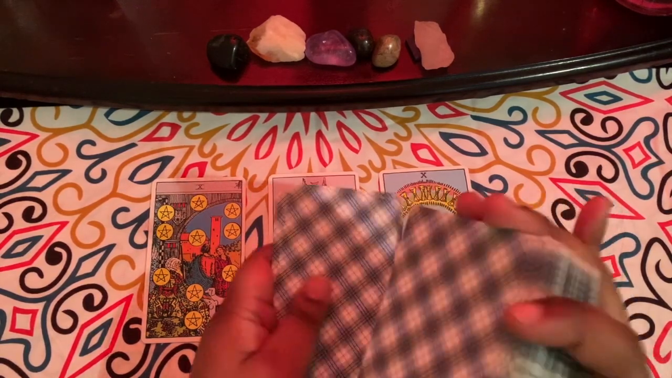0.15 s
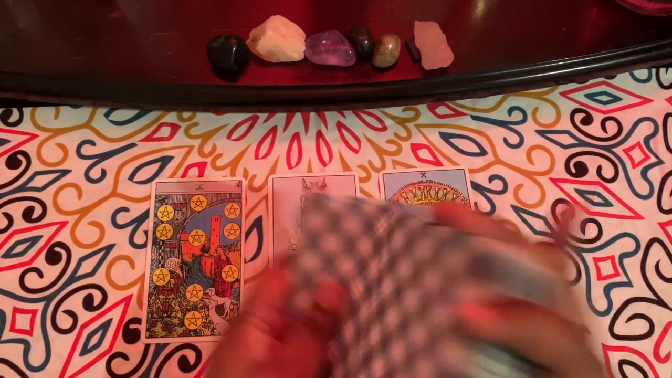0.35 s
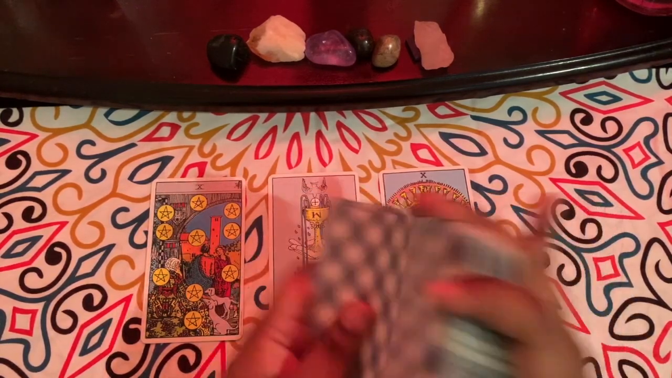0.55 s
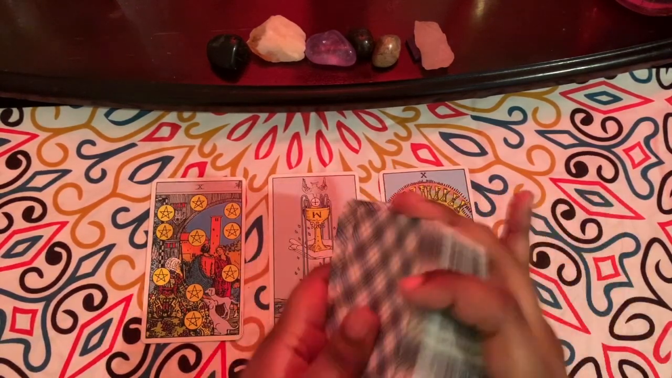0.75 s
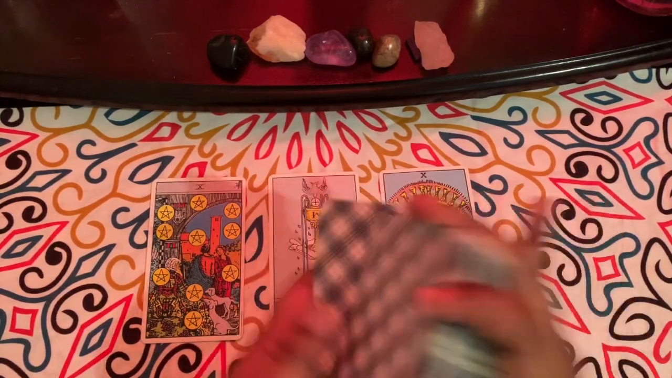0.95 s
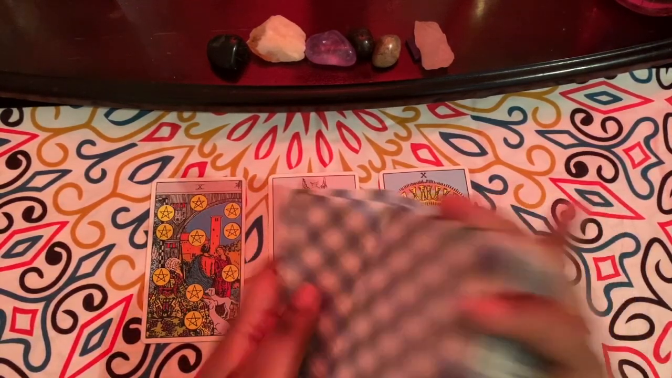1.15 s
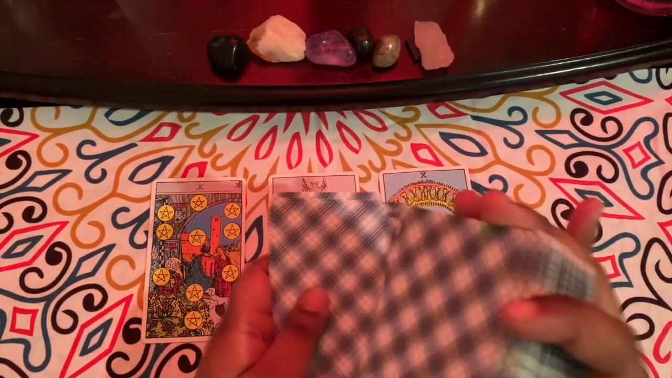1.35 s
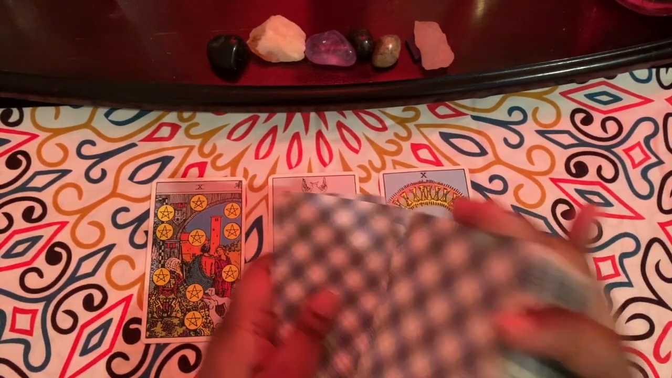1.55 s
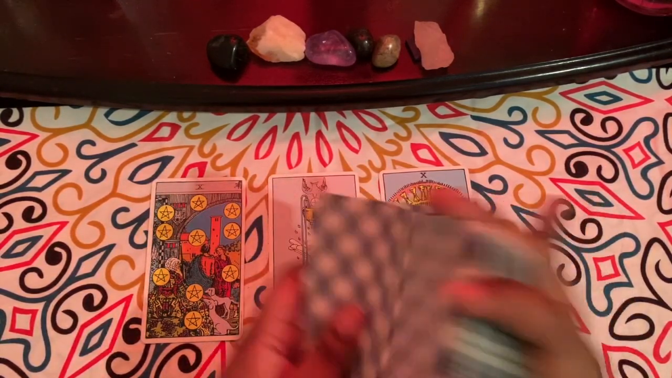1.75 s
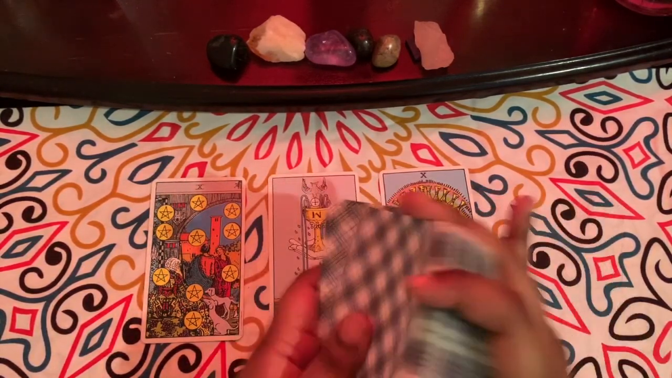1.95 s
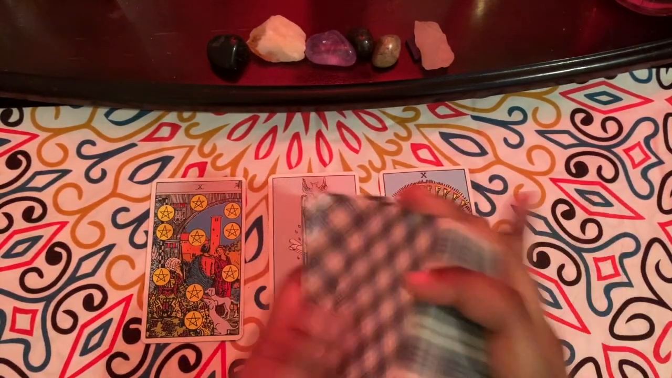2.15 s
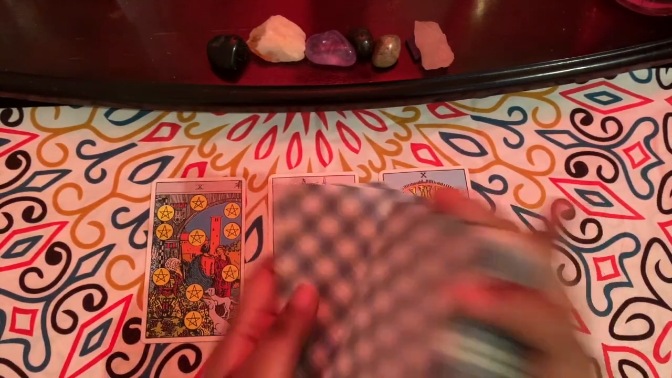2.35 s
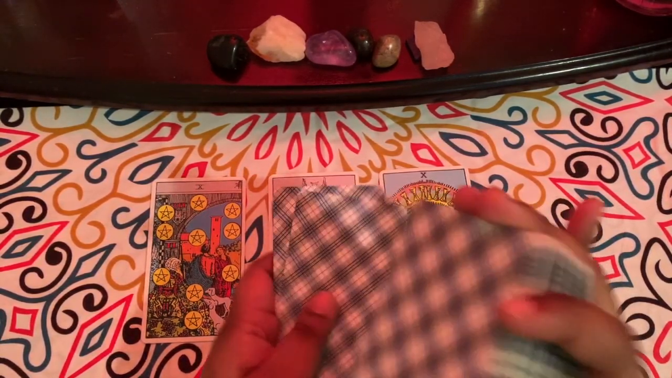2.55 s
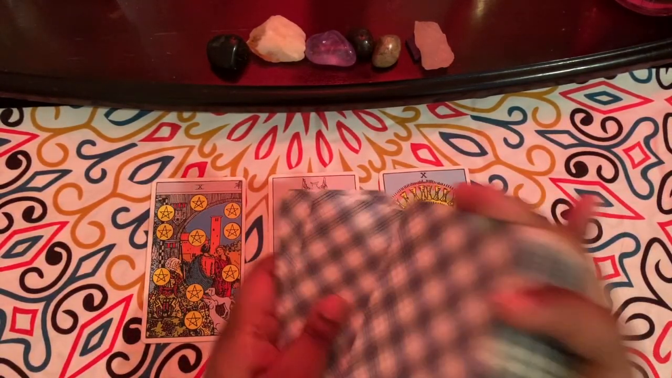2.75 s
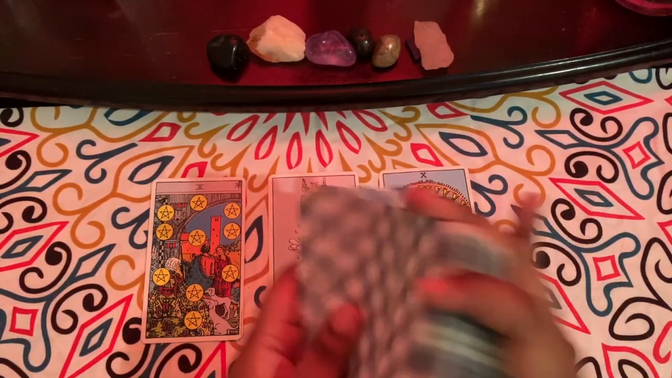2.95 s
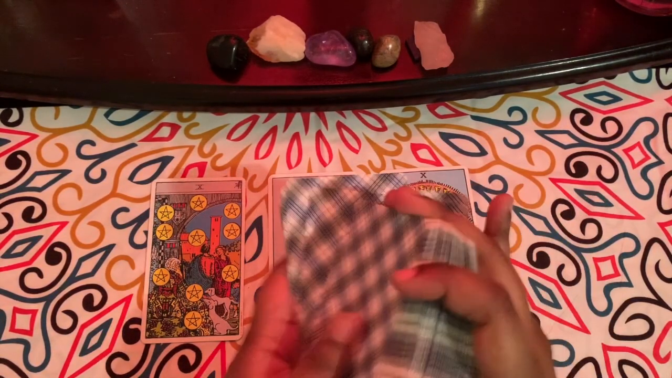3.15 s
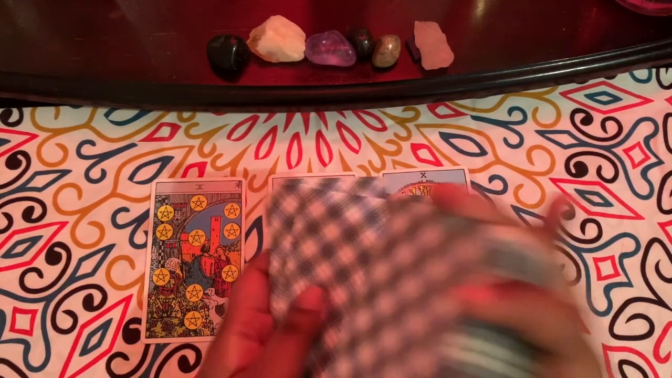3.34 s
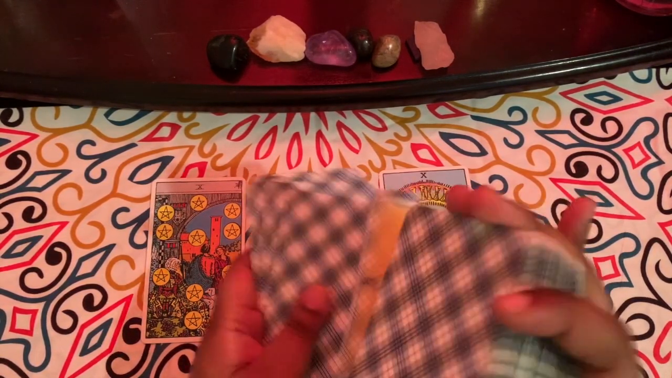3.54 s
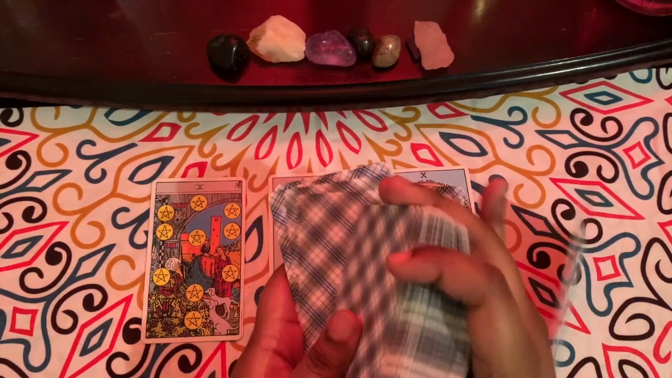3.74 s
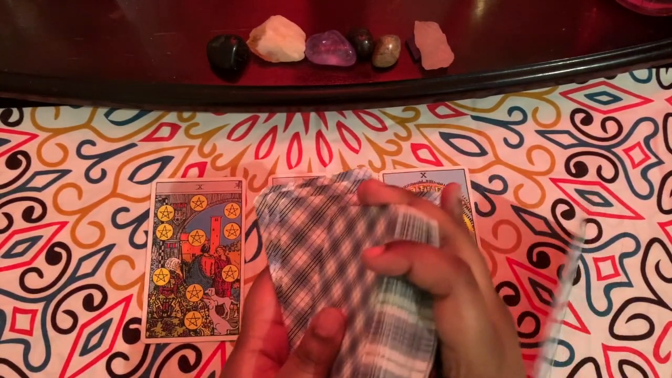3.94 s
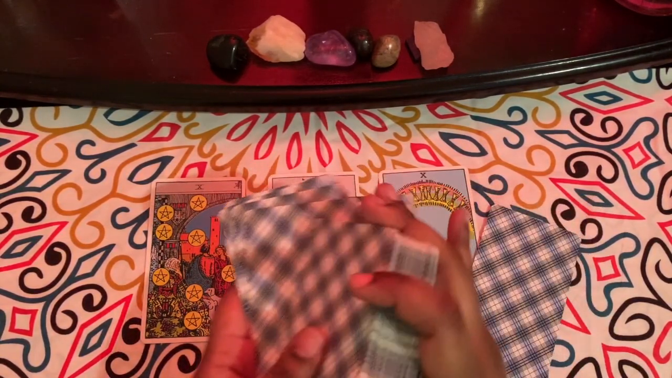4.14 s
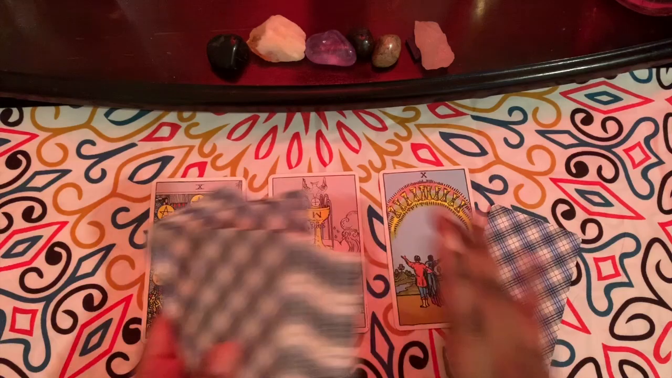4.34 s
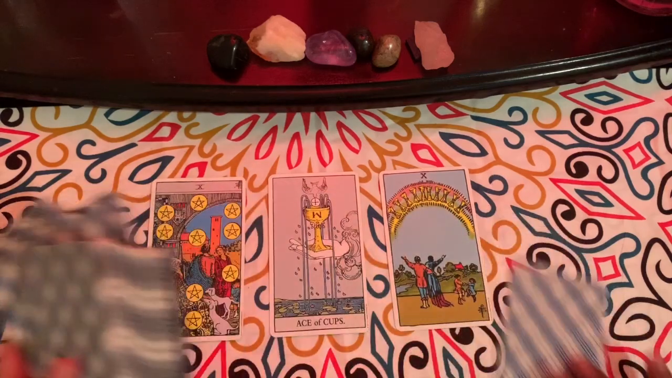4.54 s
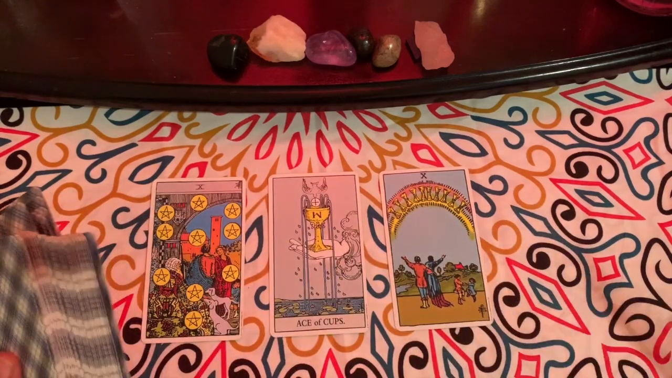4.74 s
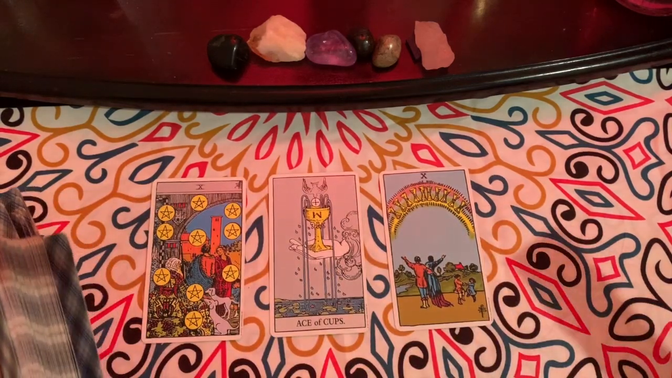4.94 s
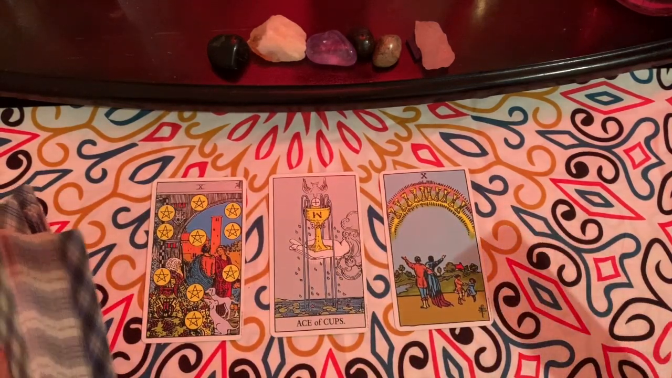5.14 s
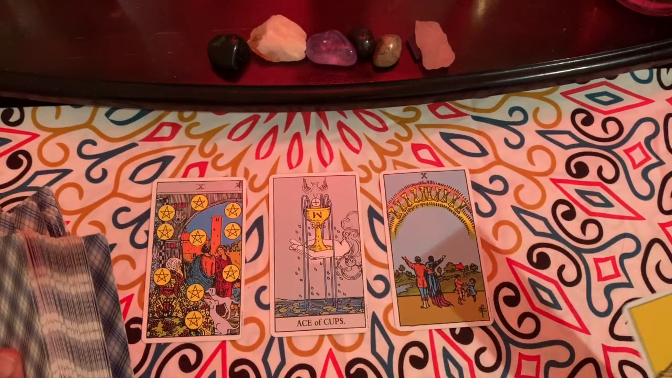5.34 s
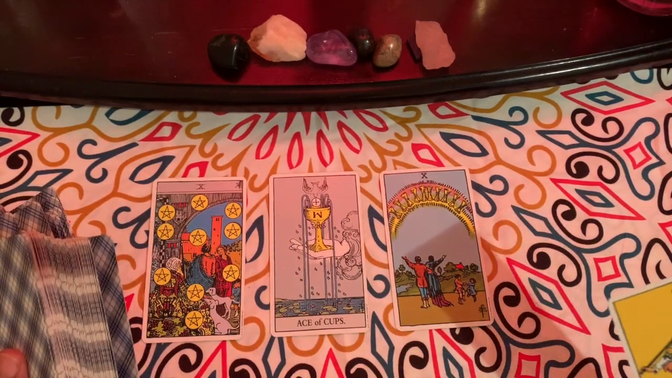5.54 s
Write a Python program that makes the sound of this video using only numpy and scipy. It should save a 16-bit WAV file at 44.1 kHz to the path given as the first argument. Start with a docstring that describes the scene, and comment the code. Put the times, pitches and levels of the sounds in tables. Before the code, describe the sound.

Already under way at the start, an overhand card shuffle is heard close up in a small room with short reflections. From 0 to about 3.6 seconds, fifteen strokes come at roughly four a second, slightly uneven. Each begins with a quick flutter of card edges and small ticks, then a papery slide that grows into a crisp, woody double slap in the palm, with a short puff-like thump falling in pitch. Some slaps are knockier, others snappier and brighter. The last lands near 3.57, followed by a few edge clicks. From about 3.8 to 4.3 a single card scrapes out and brushes over cloth in soft, short swells, much quieter than the shuffle. Around 4.5 come faint ticks, a brushing scrape and a low swell of stirred air; near 4.75 to 4.85 the deck settles with very soft, dull bumps. Afterwards only quiet low rumble and barely audible tones remain.

```python
"""A room already ringing with decaying noise, over rumble and faint tones, holds an overhand card shuffle.
About four times a second a packet is lifted (a flutter of edge ticks), slides (stick-slip noise) and lands
in the palm: a double slap of struck resonances, and a puff of air as a tone of falling pitch.
Then one card is drawn and laid on the cloth in swelling scrapes of friction noise, and the deck is put
down with soft bumps of filtered noise. Reflections and a diffuse tail give the small room."""
import sys
import numpy as np
from scipy import signal
from scipy.fft import rfft, irfft, next_fast_len
from scipy.io import wavfile
from scipy.ndimage import uniform_filter1d

SR = 44100
rng = np.random.default_rng(int(sys.argv[2]) if len(sys.argv) > 2 else 0)


def to_wav(sig):
    """Store sig (one row per channel, or 1-D mono) as 16-bit WAV at the path in sys.argv[1].

    Samples outside -1..1 are clipped; the rate is SR.
    """
    pcm = np.clip(np.atleast_2d(sig), -1, 1) * 32767
    pcm = np.round(pcm).astype(np.int16)
    wavfile.write(sys.argv[1], SR, pcm.T)  # frames by channels


N = 246519

# A packet lands, edge first: [t/s, lead of the edge/s, edge level/dB, knock level/dB, snap level/dB,
# tick level/dB, puff level before its common lift/dB, f of the hollow of the hands/Hz, f of card flex/Hz]
SLAPS = [(0.171, 0.0049, -25, -15, -20.5, -28.5, -31.5, 1320, 4060),
         (0.4184, 0.006, -24.5, -24, -22.5, -25.5, -34, 1344, 4130),
         (0.642, 0.0058, -22, -19, -25, -26, -31, 1230, 3630),
         (0.8785, 0.0052, -21.5, -17.5, -31, -28.5, -30.5, 1240, 3510),
         (1.13, 0.0064, -20, -23.5, -33.5, -22.5, -32, 1416, 2980),
         (1.3547, 0.0053, -20, -18.5, -19.5, -25, -31, 910, 3430),
         (1.5789, 0.0046, -21, -18, -20, -16.5, -29, 1400, 3530),
         (1.832, 0.005, -22, -15, -19.5, -20.5, -30, 1260, 1930),
         (2.0687, 0.0046, -19, -13.5, -16, -26, -30, 1300, 3100),
         (2.3185, 0.0053, -18.5, -25.5, -25, -18.5, -31, 1350, 4220),
         (2.5496, .0045, -21.5, -19.5, -14.5, -20.5, -29.5, 1280, 2120),
         (2.7869, .0046, -23.5, -21, -14.5, -14.5, -29.5, 1290, 2470),
         (3.0545, 0.0055, -21, -23, -21.5, -19, -31.5, 1216, 2880),
         (3.293, 0.0038, -24, -21, -18.5, -18.5, -31, 1290, 2070),
         (3.568, 0.0036, -32.5, -17.5, -18, -21, -31.5, 990, 3600)]
# Colour of the leading edge, relative to its edge level: [knock level/dB, snap level/dB, tick level/dB]
EDGE_DB = (-5.5, 0.5, -2)
# A card edge catches and snaps free: [t/s, knock level/dB, snap level/dB, tick level/dB]
CLICKS = [(0.0465, -32.5, -28.5, -28.5), (0.0571, -24, -26.5, -26), (0.0738, -28.5, -31, -36),
          (0.2898, -21.5, -28, -31), (0.3104, -36, -36, -29.5), (0.519, -28, -21, -25),
          (0.7657, -31.5, -28.5, -27), (0.7837, -19.5, -25, -27.5), (1.2349, -24, -21.5, -28.5),
          (1.2606, -31, -29.5, -33), (1.4725, -20.5, -27, -28.5), (1.4958, -26, -26, -32.5),
          (1.7091, -27.5, -33, -30), (1.954, -22.5, -24, -21), (2.1851, -27, -31, -34),
          (2.424, -22, -32, -29), (3.1674, -19.5, -27.5, -23.5), (3.4093, -18.5, -32, -35),
          (3.5905, -27, -62, -34.5), (3.6561, -27.5, -17.5, -28), (3.6782, -31.5, -39, -32),
          (3.888, -57, -59, -66), (4.052, -39.5, -43, -52), (4.2452, -45, -49.5, -53),
          (4.2671, -56, -42, -49), (4.4819, -66, -39, -45), (4.503, -78, -62, -46.5)]
# Edges run over one another as a packet is lifted: [t/s, length/s, knock level/dB, snap level/dB,
# tick level/dB, f of the hollow of the hands/Hz, f of card flex/Hz]; levels before a common trim
FLUTTERS = [(0.044, 0.018, -34.5, -38, -38, 1020, 3270), (0.28, 0.034, -34, -35, -36, 1030, 2730),
            (0.509, 0.031, -31.5, -33.5, -34.5, 1120, 3220), (0.757, 0.038, -35, -34, -39, 1290, 2440),
            (0.994, 0.033, -34.5, -37, -38.5, 1230, 3960), (1.225, 0.024, -29.5, -37, -34, 1390, 2106),
            (1.465, 0.026, -38.5, -35.5, -37, 1030, 2110), (1.701, 0.034, -36, -37, -40, 830, 1956),
            (1.948, 0.025, -31, -33, -38, 1210, 2530), (2.185, 0.033, -36.5, -35.5, -36.5, 1050, 3470),
            (2.423, 0.025, -28, -31.5, -35.5, 1250, 3240), (2.667, 0.022, -32, -37, -36.5, 1170, 2710),
            (2.912, 0.04, -35.5, -39, -40.5, 1200, 2026), (3.157, 0.029, -29.5, -30, -34.5, 1340, 4025),
            (3.408, 0.041, -38.5, -39, -36.5, 766, 2224), (3.65, 0.039, -29.5, -33.5, -31, 1260, 2810)]
# One card scrapes out of the deck and over the cloth: [t of the peak/s, rise/s, fall/s, knock level/dB,
# snap level/dB, tick level/dB]
SCRAPES = [(3.78, 0.0046, 0.027, -49.5, -51, -55), (4.05, 0.023, 0.014, -42.5, -48, -48.5),
           (4.115, 0.043, 0.052, -59, -58.5, -64), (4.246, 0.03, 0.039, -56.5, -56, -56.5),
           (4.482, 0.0054, 0.017, -57, -53.5, -53), (4.537, 0.031, 0.076, -72.5, -66, -52),
           (4.698, 0.035, 0.023, -73.5, -66, -64.5)]
# Soft bumps of hand and deck: [t/s, level/dB, decay/s, f of the upper edge/Hz]
BUMPS = [(3.256, -36, 0.0046, 1510), (3.762, -37, 0.011, 1110), (3.784, -49.5, 0.022, 910),
         (4.265, -50.5, 0.01, 910), (4.491, -49, 0.013, 339), (4.759, -54.5, 0.023, 651),
         (4.83, -66.5, 0.031, 453)]
# Spectra of the three parts of a contact, low to high: [f/Hz, level/dB]
KNOCK = [(110, -26.5), (210, -6.5), (290, -7.5), (420, -10.5), (600, -11), (760, -6), (1020, -4.5),
         (1130, -4.5), (1290, -2), (1550, -8), (1900, -19.5), (3000, -33.5)]
SNAP = [(900, -43.5), (1400, -6.5), (1750, 5.5), (2600, 3), (3300, 5), (4100, 4), (4900, 0), (6500, -32.5)]
TICK = [(3000, -28.5), (4300, -11.5), (5200, 2.5), (7000, 4), (8000, 1.5), (9500, -4.5), (12600, -2),
        (14500, -14.5), (15700, -10)]
# Low part of a single scraping card, with less hollow than the whole deck: [f/Hz, level/dB]
SCRAPE = [(300, -13), (600, -11), (800, 1), (1150, 2.5), (1450, 3), (1800, -4), (2100, -41), (3000, -37)]
# Spectrum of a bump before its upper edge is cut: [f/Hz, level/dB]
BUMP = [(60, -20), (110, -8), (200, 0.5), (310, 0), (440, -3), (620, -3.5), (720, -5.5), (900, -0.5),
        (1500, -6), (6000, 9)]
# Share of independent noise at the two ports, relative to the common noise: [knock, snap, tick]
APART = [.25, .75, .5]
# Phase lead of the left microphone port over the right: [f/Hz, phase/rad]
PORT_PHASE = [(0, 0), (400, .4), (800, -.5), (1500, -.3), (2600, -1.4), (3200, -.8), (4200, -1.1),
              (4900, -3.1), (7200, -6.3), (9450, -9.4), (11600, -12.6), (13800, -15.7), (15800, -18.8)]
# Left level minus right level: [f/Hz, level/dB]
PORT_BALANCE = [(100, 3.5), (300, 0.6), (620, 5.5), (1200, 0.5), (2500, 2.5), (3400, 0), (4600, 3),
                (5600, -0.5), (15000, 0.5)]
# Reflections from ceiling and walls: [delay/s, level/dB]
ECHOES = [(.0036, -37), (0.0098, -25), (0.01, -15.5), (.0215, -30), (0.031, -28)]
# Reverberation time, for a decay of 60 dB: [f/Hz, T60/s]
ROOM_T60 = [(100, 0.9), (500, 0.29), (1300, 0.36), (3500, 0.36), (8000, 0.31), (15000, 0.25)]
# Spectrum of the reverberation at its start: [f/Hz, level/dB]
ROOM_COLOUR = [(100, -11), (550, 8), (1000, -4), (1320, 1), (1600, 1.5), (3500, 2.5), (7000, 0.5),
               (15000, 1.5)]
# Spectrum of the background noise: [f/Hz, level/dB]
FLOOR = [(25, -13), (40, -8), (58, 2), (110, -2.5), (195, -15.5), (290, -15.5), (360, -25.5), (500, -30.5),
         (650, -26.5), (880, -34), (1400, -38.5), (2500, -46.5), (7000, -44.5), (15000, -51)]
# Slow swells and dips of the rumble from stirred air: [t/s, half length/s, level change/dB]
SWEEPS = [(3.958, .15, -2.5), (4.61, 0.18, 8.5)]
# Faint tones, held at constant level; 623 Hz stands for a faint ring after the deck is put down:
# [f/Hz, level/dB]
TONES = [(290.7, -77.5), (623, -85), (699.8, -86.5)]

# Loose cards: (knock, snap, tick) relative to the flutter/dB, span as a multiple of the flutter length
LOOSE_DB, LOOSE_SPAN = (-0.5, -0.5, 0.5), 1.1
LOOSE_FADE_DB, LOOSE_SPREAD_DB = -1.5, 3  # change by the end of the span, random deviation
# Slide: duration before the landing, rise at its start, time constant of the stop (all s)
SLIDE_S, SLIDE_ATTACK_S, SLIDE_STOP_S = .083, 0.021, 0.0071
# (knock, snap, tick) of the slide: level at the landing, growth on the way
SLIDE_DB, SLIDE_GROWTH_DB_PER_S = (-44, -39, -35), (129.5, 56, 127.5)
# Puff: nominal pitch from and to (Hz), time constant of the fall (s); swell, nominal decay (s)
PUFF_START_HZ, PUFF_END_HZ, PUFF_FALL_S = 440, 52, .0048
PUFF_SWELL_S, PUFF_DECAY_S = .013, .0095
SNAGS_PER_S, SNAG_DB = 95, 21.5  # random catches in a scrape: mean rate, strength over the rub
# Rumble during the shuffle and after it (dB), and the change from and to (s)
SHUFFLE_DB, AFTER_DB, SETTLE_S = -52, -61.5, (4.05, 4.3)
EDGE_HZ = 15950  # upper band limit


def amp(db):
    """Level law: decibels to amplitude ratio."""
    return 10 ** (np.asarray(db) / 20)


def evened(x):
    """Mean power: scales a signal to rms 1."""
    return x / np.sqrt(np.mean(x ** 2) + 1e-20)


def read(points, hz):
    """Logarithmic frequency scale: interpolates a table at hz."""
    f, value = np.transpose(points)
    return np.interp(np.log(hz + 1), np.log(f + 1), value)


def add(mix, s, sound):
    """Superposition: adds a stereo sound to the mix at time s."""
    part = mix[:, max(round(s * SR), 0):][:, :sound.shape[1]]
    part += sound[:, :part.shape[1]]


def body(points, hz=1000, lift_db=0, width=0.06, size=2048):
    """Minimum-phase resonator: a causal response of energy 1 with this spectrum and one resonance at hz."""
    f = abs(np.fft.fftfreq(size, 1 / SR)) + 1
    low_end = 1 + (points[0][0] / f) ** 4
    high_end = 1 + (f / points[-1][0] / 2) ** 4
    peak_db = lift_db / (1 + (np.log(f / hz) / width) ** 2)
    gain = amp(read(points, f) + peak_db) / (low_end * high_end)
    # the Hilbert transform of the log gain supplies the phase
    log_response = np.conj(signal.hilbert(np.log(gain + 1e-5)))
    taps = np.fft.ifft(np.exp(log_response)).real[:size // 2]
    return taps / np.linalg.norm(taps)


def ring(x, taps):
    """Linear resonance: convolves each channel with an impulse response."""
    return signal.fftconvolve(x, np.atleast_2d(taps), axes=1)


def grains(size, spread_db, apart):
    """Granular friction: many slips of uneven size, partly independent at the two ports."""
    size_db = spread_db * np.minimum(rng.exponential(1, size), 5)
    slips = rng.standard_normal((3, size)) * amp(size_db)
    return evened(slips[0] + apart * slips[1:])


def rub(size, apart):
    """Stick-slip: friction noise whose level wanders over a few milliseconds."""
    stick = evened(uniform_filter1d(rng.standard_normal(size), 200))
    return evened(grains(size, 3.6, apart) * amp(2.6 * stick))


def grip(hollow_hz, flex_hz):
    """Resonance: the hollow of the hands tunes the knock, the flex of the packet the snap."""
    knock = body(KNOCK, hollow_hz, lift_db=4.5, width=0.12)
    snap = body(SNAP, flex_hz, lift_db=5, width=.12)
    return [knock, snap, body(TICK)]


def any_grip():
    """Variable resonance: a hold of the deck drawn at random."""
    return grip(rng.uniform(950, 1450), rng.uniform(2200, 3700))


def strike(levels_db, parts, decays, scatter):
    """Impact excitation: a sharp touch amid decaying chatter of the cards sets the resonances ringing."""
    t = np.arange(SR // 80) / SR
    out = 0
    for db, taps, decay, apart in zip(levels_db, parts, decays, APART):
        push = grains(len(t), 0, apart) * np.exp(-t / decay)
        push *= scatter / np.sqrt(np.sum(push ** 2) / 2)
        push[:, SR // 3000] += 1  # the touch, a third of a millisecond in
        sound = ring(push, taps)
        # the level is the total energy expressed as rms over 4 ms
        out = out + amp(db) * sound / np.sqrt(np.sum(sound ** 2) / 2 / (SR * .004))
    return out


def click(levels_db):
    """Light impact: the brief contact of a card edge."""
    return strike(levels_db, any_grip(), (.0008, .0009, .0009), scatter=2.5)


def slaps():
    """Double impact: each packet hits the stack in the palm, edge first and then flat."""
    out = np.zeros((2, N))
    for s, lead, edge_db, *levels_db, _, hollow_hz, flex_hz in SLAPS:
        add(out, s - lead, click(np.add(EDGE_DB, edge_db)))
        parts = grip(hollow_hz, flex_hz)
        add(out, s, strike(levels_db, parts, (.0007, .001, .001), scatter=2.6))
    return out


def puffs(lift_db=4):
    """Damped oscillation: squeezed air and the give of the palm make a thump that sinks in pitch."""
    out, t = np.zeros((2, N)), np.arange(SR // 8) / SR
    # the integral of a frequency that falls exponentially
    fall = PUFF_FALL_S * (1 - np.exp(-t / PUFF_FALL_S))
    turns = PUFF_END_HZ * t + (PUFF_START_HZ - PUFF_END_HZ) * fall
    rise = np.minimum(.15 + .85 * t / PUFF_SWELL_S, 1)
    onset = np.minimum(t / 0.00082, 1)
    for s, *_, db, _, _ in SLAPS:
        tension, damping = rng.uniform(.97, 1.03), rng.uniform(.8, 1.25)
        swell = rise * np.exp(-damping * np.maximum(t - PUFF_SWELL_S, 0) / PUFF_DECAY_S)
        thump = -amp(db + lift_db) * swell * onset * np.cos(2 * np.pi * tension * turns)
        add(out, s, np.array([thump, thump]))
    return out


def clicks():
    """Elastic release: card edges catch and snap free."""
    out = np.zeros((2, N))
    for s, *levels_db in CLICKS:
        add(out, s, click(levels_db))
    return out


def flutters(lead_db=-19):
    """Repeated release: the packet creeps, then breaks loose in a run of edge ticks that dies away."""
    lead = .008  # creep before the release, in s
    out, t = np.zeros((2, N)), np.arange(SR // 10) / SR - lead
    for s, length, *levels_db, hollow_hz, flex_hz in FLUTTERS:
        creep = amp(lead_db) * (1 + t / lead)
        shape = np.where(t < 0, creep, np.exp(-np.maximum(t - 0.84 * length, 0) / 0.0026))
        # about 450 edges a second, each fading in 0.24 ms, over a steady rub
        edges = (rng.random(len(t)) < 450 / SR) * rng.uniform(0.3, 1, len(t))
        contact = 0.29 + signal.lfilter([1], [1, -np.exp(-1 / (0.00024 * SR))], edges)
        drive = evened(grains(len(t), 3.13, 0.35) * contact) * shape
        trimmed_db = np.add(levels_db, [-.5, -.8, -.5])
        for db, taps in zip(trimmed_db, grip(hollow_hz, flex_hz)):
            add(out, s - lead, amp(db) * ring(drive, taps))
    return out


def loose_cards(count=4):
    """Successive impacts: cards lag behind each lifted packet and tick back, on average ever more softly."""
    out = np.zeros((2, N))
    for s, length, *levels_db, _, _ in FLUTTERS:
        for k in range(count):
            share = max(k - rng.uniform(0, .7), 0) / (count - 1)
            db = LOOSE_FADE_DB * share + LOOSE_SPREAD_DB * rng.standard_normal()
            add(out, s + .002 + share * LOOSE_SPAN * length, click(np.add(levels_db, LOOSE_DB) + db))
    return out


def slides():
    """Sliding friction: card faces rub harder as the packet speeds up, and stop in the palm."""
    out, t = np.zeros((2, N)), np.arange(SR // 7) / SR - SLIDE_S
    shape = np.minimum((t + SLIDE_S) / SLIDE_ATTACK_S, 1) * np.exp(-np.maximum(t, 0) / SLIDE_STOP_S)
    for s, *_ in SLAPS:
        for db, growth_db, taps in zip(SLIDE_DB, SLIDE_GROWTH_DB_PER_S, any_grip()):
            drive = rub(len(t), 0.16)  # each part of the faces catches on its own
            growth = amp(db + growth_db * np.minimum(t, 0))
            add(out, s - SLIDE_S, ring(drive * shape * growth, taps))
    return out


def scrapes():
    """Friction with snags: one card scrapes over deck and cloth; each push swells and dies away."""
    out, t = np.zeros((2, N)), np.arange(-SR // 5, SR // 3) / SR
    parts = [body(SCRAPE), body(SNAP), body(TICK)]
    for s, rise, fall, *levels_db in SCRAPES:
        caught = rng.random(len(t)) < SNAGS_PER_S / SR
        snags = amp(SNAG_DB) * rng.standard_normal(len(t)) * caught
        swell = np.exp(np.minimum(t / rise, -t / fall))
        drive = evened(rub(len(t), 0.49) + snags) * swell
        for db, taps in zip(levels_db, parts):
            add(out, s + t[0], ring(amp(db) * drive, taps))
    return out


def bumps():
    """Padded impact: soft contact of hands and deck leaves only low frequencies."""
    out, t = np.zeros((2, N)), np.arange(SR // 4) / SR
    for s, db, decay, edge_hz in BUMPS:
        sound = ring(grains(len(t), 0.85, 0.9) * np.exp(-t / decay), body(BUMP))
        sound = signal.sosfilt(signal.butter(3, edge_hz, fs=SR, output="sos"), sound)
        # the level is the total energy expressed as rms over one decay time
        add(out, s, amp(db) * sound / np.sqrt(np.sum(sound ** 2) / 2 / (SR * decay)))
    return out


def ports(x):
    """Path difference: the hands are nearer the right port, so the treble reaches the left one later."""
    size = next_fast_len(N + SR // 10)
    hz = np.fft.rfftfreq(size, 1 / SR)
    phase, balance_db = np.interp(hz, *np.transpose(PORT_PHASE)), read(PORT_BALANCE, hz)
    pair = np.array([amp(balance_db / 2) * np.exp(1j * phase), amp(-balance_db / 2)])
    return irfft(rfft(x, size) * pair, size)[:, :N]


def echoes(x, low_hz=750, high_hz=1600, treble=0.075):
    """Early reflection: delayed copies, strongest in the knock of the cupped hands."""
    band = signal.sosfilt(signal.butter(2, [low_hz, high_hz], "band", fs=SR, output="sos"), x)
    out = np.zeros((2, N))
    for delay, db in ECHOES:
        add(out, delay, amp(db) * (band + treble * x))  # treble: share of the full-band sound
    return out


def room(x, early, early_decay, shared):
    """Diffuse reverberation: sparse random reflections, stronger at first from the table close below."""
    t = np.arange(SR // 2) / SR
    signs = rng.choice([-1., 1.], (3, len(t)))
    taps = signs * (rng.random((3, len(t))) < 5000 / SR)
    taps = (shared * taps[0] + taps[1:]) * (t > .0015) * (1 + early * np.exp(-t / early_decay))
    # each frequency decays at its own rate
    hz, age, z = signal.stft(taps, SR, nperseg=256)
    z = z * amp(read(ROOM_COLOUR, hz)[:, None] - 60 * age / read(ROOM_T60, hz)[:, None])
    tail = signal.istft(z, SR, nperseg=256)[1]
    return ring(x, tail / np.linalg.norm(tail, axis=1, keepdims=True))[:, :N]


def moving_room(x, count=5):
    """Varying reverberation: for the moving hands, random tails crossfade in a cycle at equal power."""
    place = np.arange(N) / SR / .185  # one tail to the next in 0.185 s
    nearness = [np.clip(1 - abs((place - k + 1) % count - 1), 0, 1) for k in range(count)]
    return sum(room(x * np.sqrt(share), early=3.57, early_decay=0.011, shared=1.7) for share in nearness)


def lingering(level_db=-53):
    """Exponential decay: the shuffle is under way, so the room still rings from the stroke before."""
    t = np.arange(N) / SR
    wash = ring(grains(N, 0, 0.97), body(ROOM_COLOUR) + body(SNAP))[:, :N]
    return evened(wash) * amp(np.maximum(level_db - 60 * t / read(ROOM_T60, 1000), -200))


def floor():
    """Broadband noise: rumble of room and stirred air, lower after the shuffle, with a trace of hiss."""
    t, spectrum = np.arange(N) / SR, amp(read(FLOOR, np.fft.rfftfreq(N, 1 / SR)))
    level_db = np.interp(t, SETTLE_S, (SHUFFLE_DB, AFTER_DB))
    level_db = level_db + sum(db * np.exp(-((t - s) / half) ** 2) for s, half, db in SWEEPS)
    return amp(level_db) * evened(irfft(rfft(grains(N, 0, 0.4)) * spectrum, N))


def tones():
    """Sinusoids: faint tones of random phase, held at constant level; 623 Hz stands for a late faint ring."""
    t = np.arange(N) / SR
    return sum(amp(db) * np.sqrt(2) * np.sin(2 * np.pi * (hz * t + rng.random())) for hz, db in TONES)


def scene():
    """Superposition: cards and hands, their reflections, and the quiet room."""
    shuffle = slaps() + clicks() + flutters() + loose_cards() + slides()
    direct = ports(shuffle + scrapes() + bumps())
    air = ports(puffs())
    reverberation = amp(-8.5) * moving_room(direct + .5 * air)
    return direct + air + echoes(direct) + reverberation + lingering() + floor() + tones()


def record(dry):
    """Saturation and band limit: peaks are rounded off below full scale, then the top is cut."""
    held = dry / (1 + dry ** 8) ** (1 / 8)
    lowpass = signal.firwin(511, EDGE_HZ, window=("kaiser", 9), fs=SR)
    return signal.oaconvolve(held, lowpass[None], "same")


dry = scene()
out = record(dry)
to_wav(out)
```